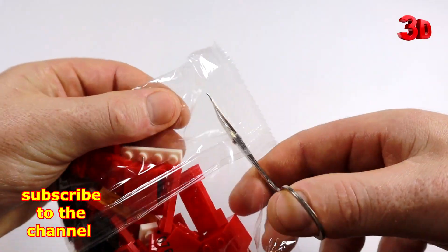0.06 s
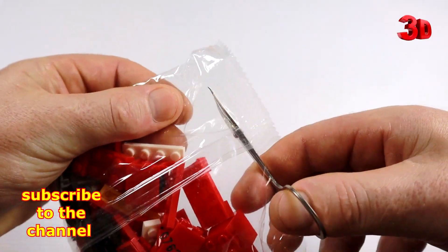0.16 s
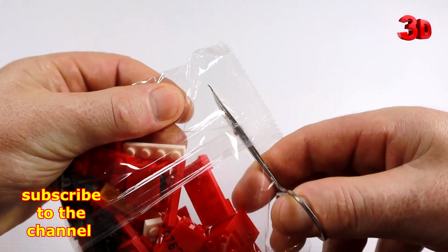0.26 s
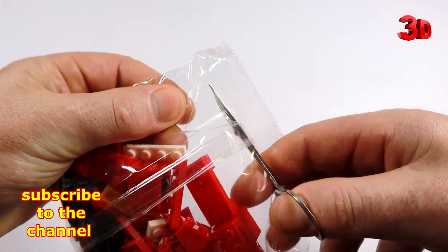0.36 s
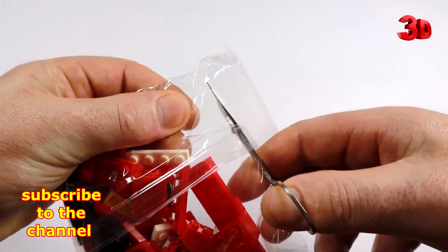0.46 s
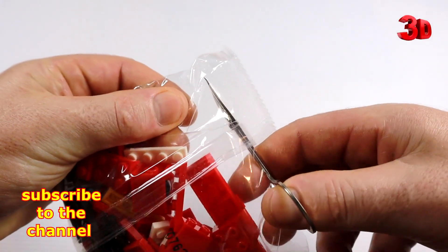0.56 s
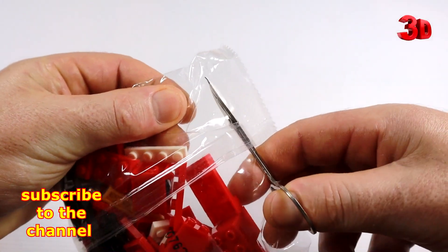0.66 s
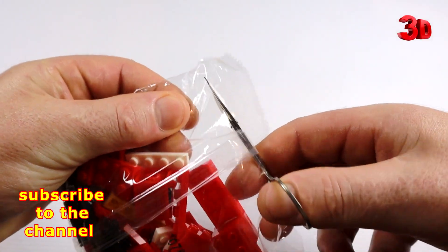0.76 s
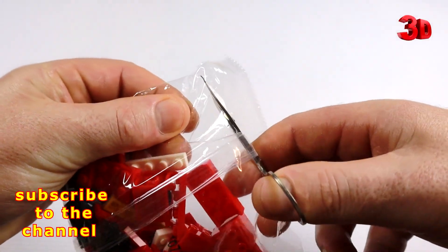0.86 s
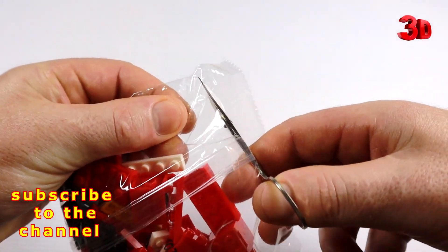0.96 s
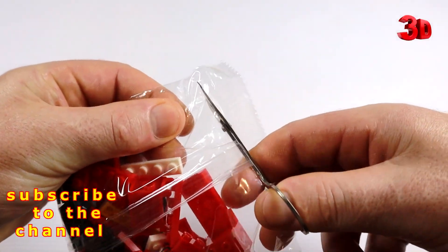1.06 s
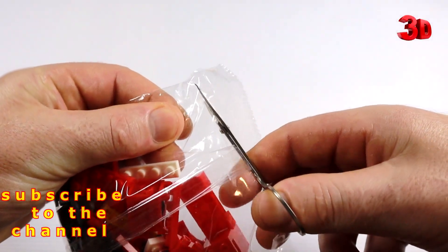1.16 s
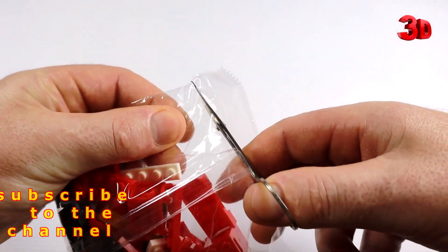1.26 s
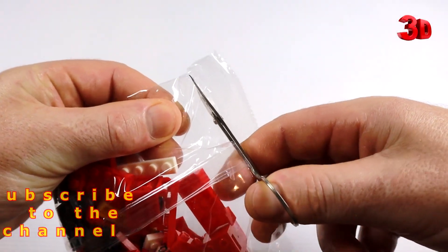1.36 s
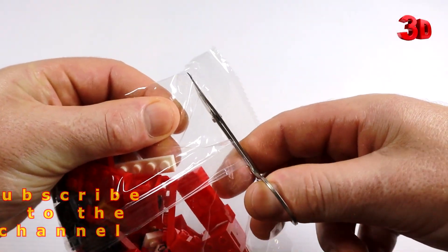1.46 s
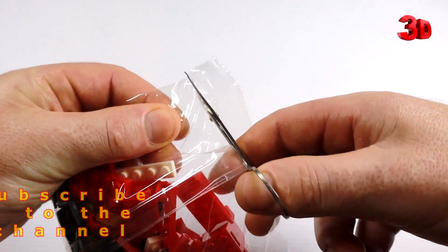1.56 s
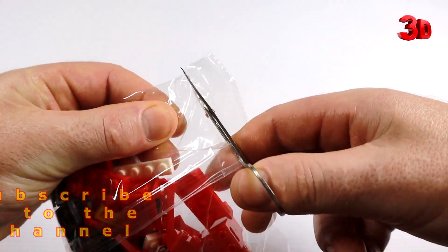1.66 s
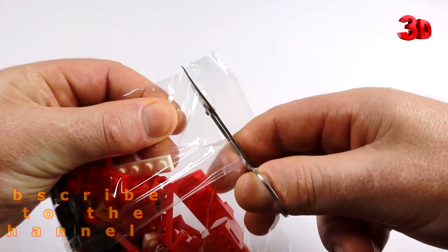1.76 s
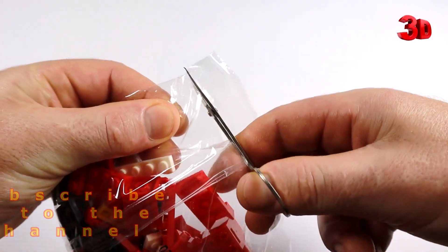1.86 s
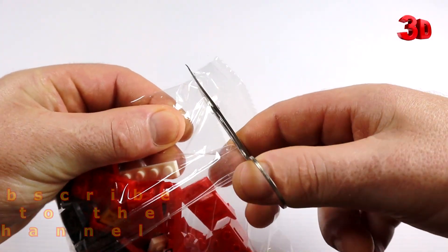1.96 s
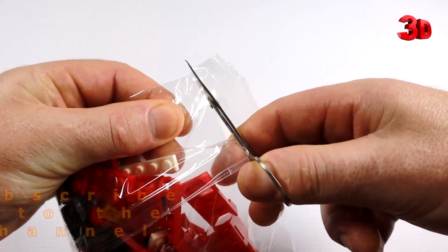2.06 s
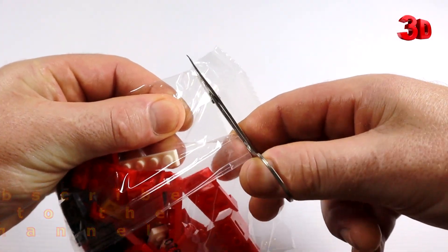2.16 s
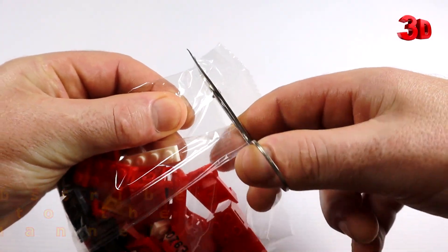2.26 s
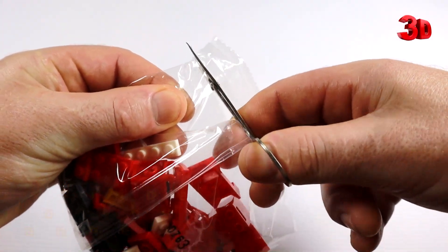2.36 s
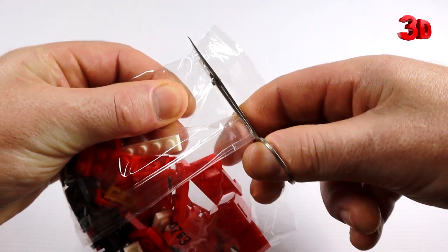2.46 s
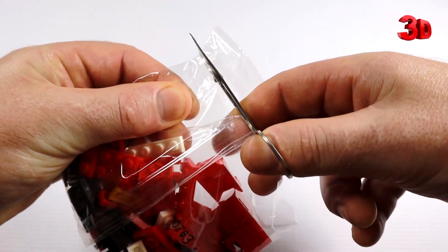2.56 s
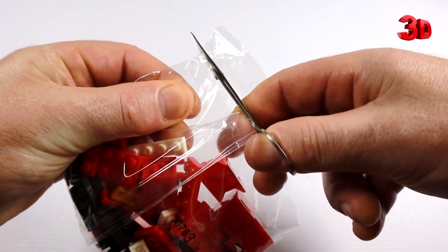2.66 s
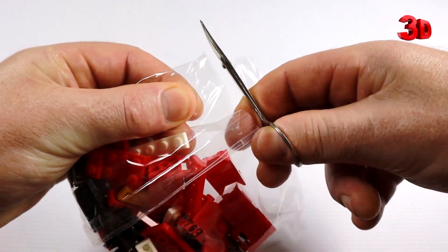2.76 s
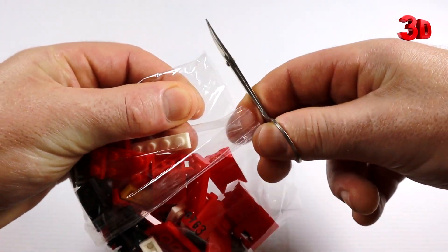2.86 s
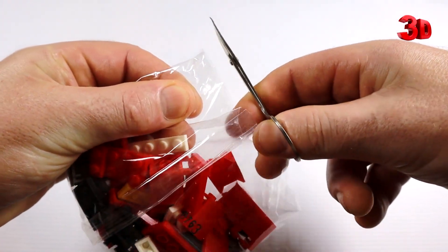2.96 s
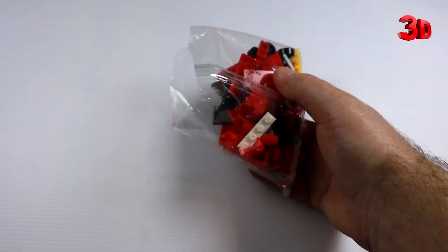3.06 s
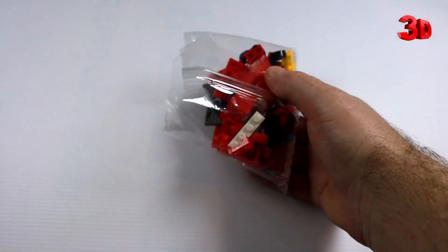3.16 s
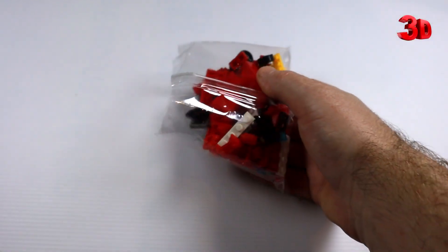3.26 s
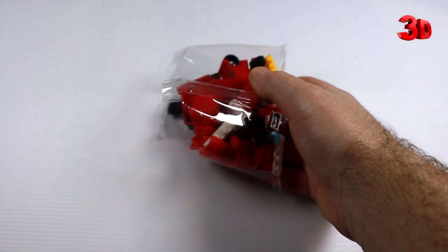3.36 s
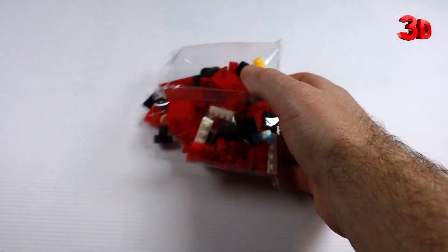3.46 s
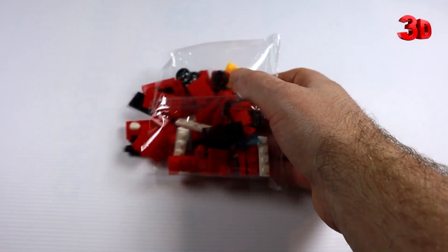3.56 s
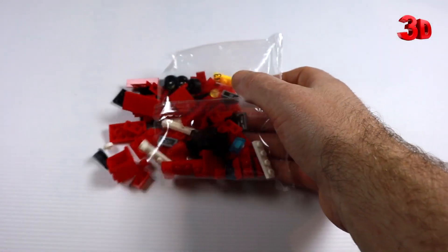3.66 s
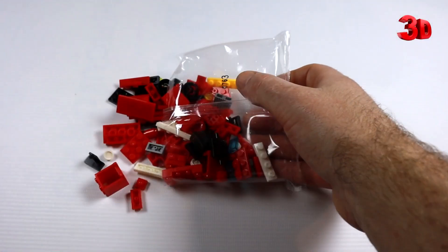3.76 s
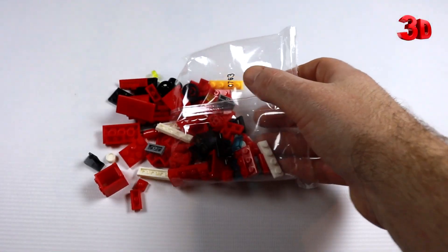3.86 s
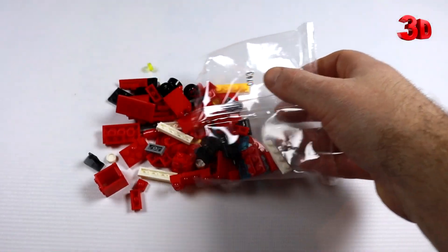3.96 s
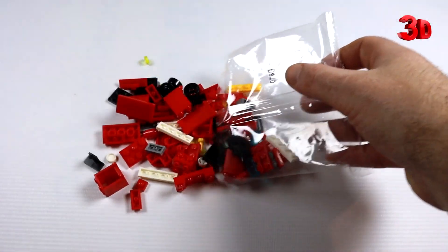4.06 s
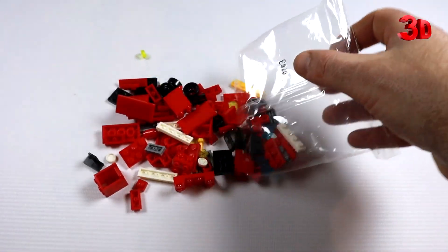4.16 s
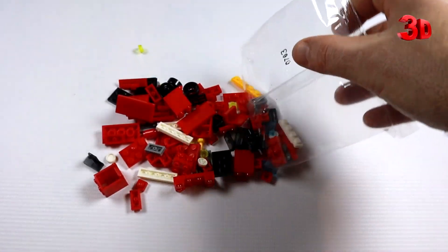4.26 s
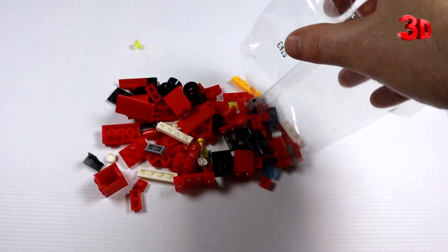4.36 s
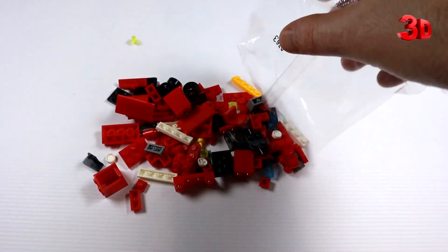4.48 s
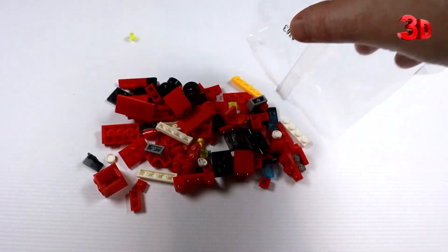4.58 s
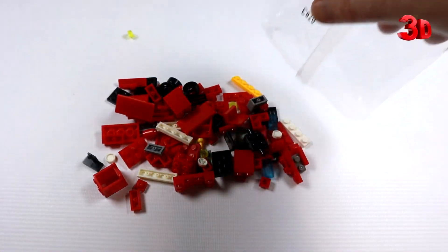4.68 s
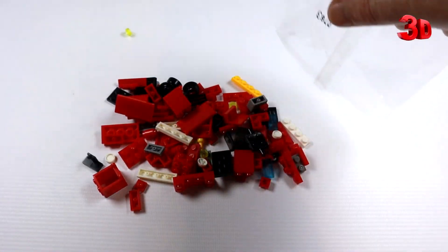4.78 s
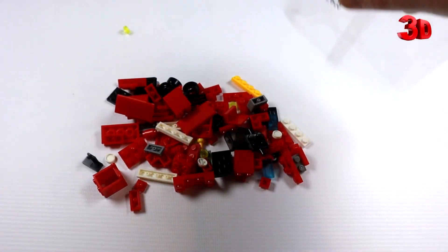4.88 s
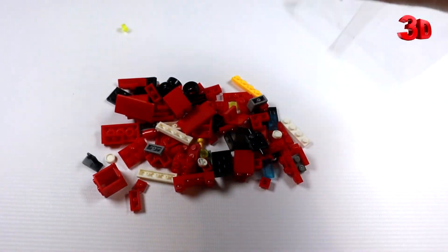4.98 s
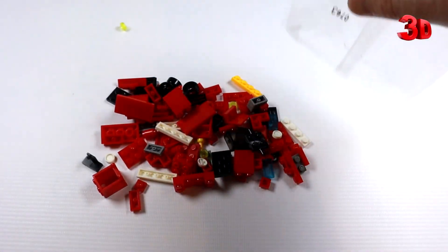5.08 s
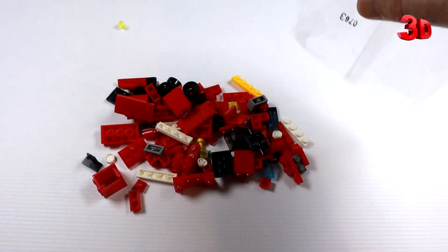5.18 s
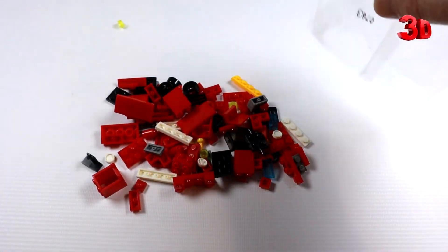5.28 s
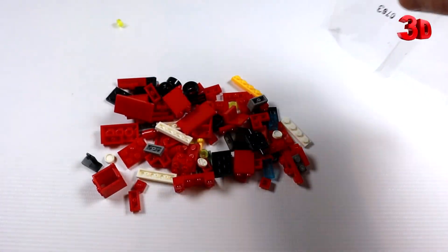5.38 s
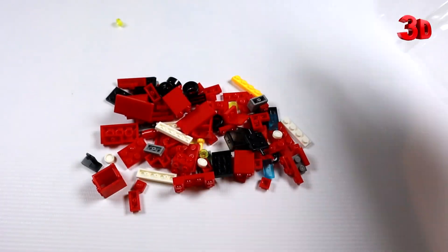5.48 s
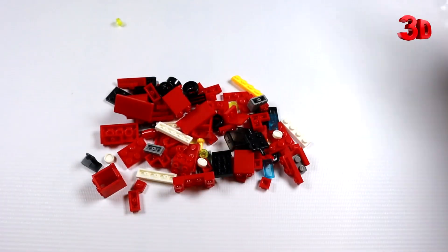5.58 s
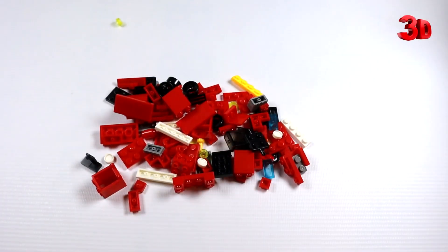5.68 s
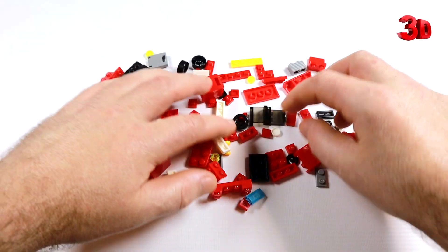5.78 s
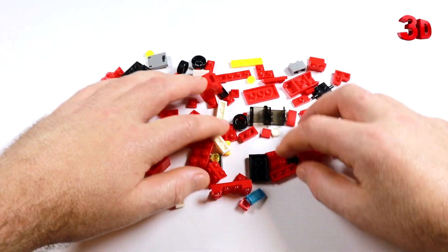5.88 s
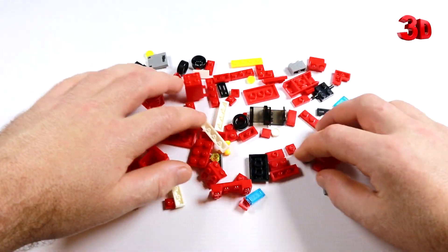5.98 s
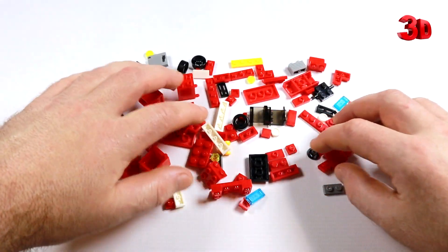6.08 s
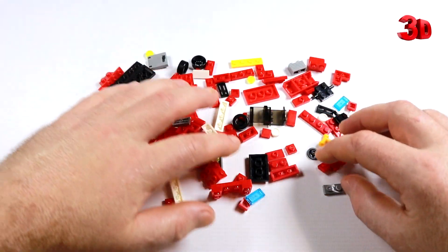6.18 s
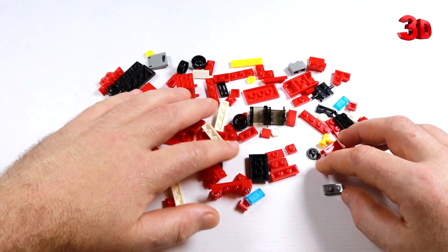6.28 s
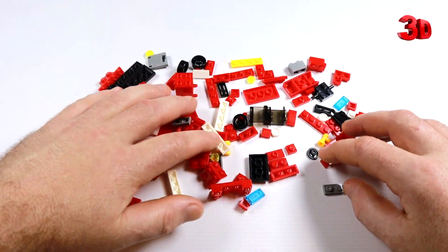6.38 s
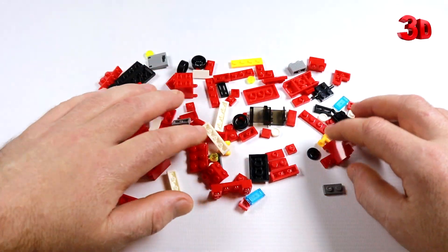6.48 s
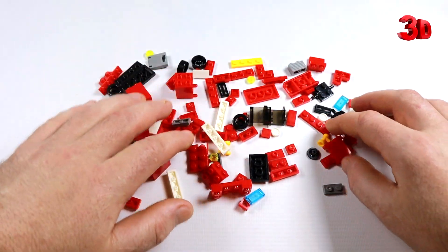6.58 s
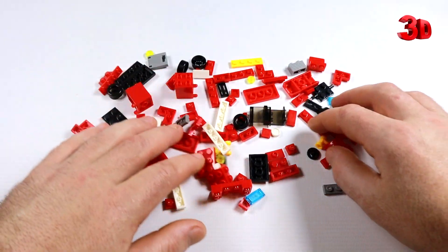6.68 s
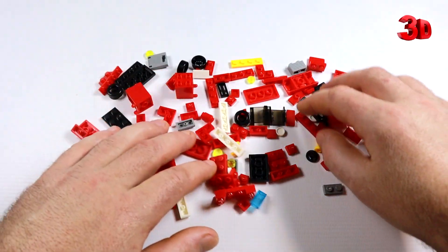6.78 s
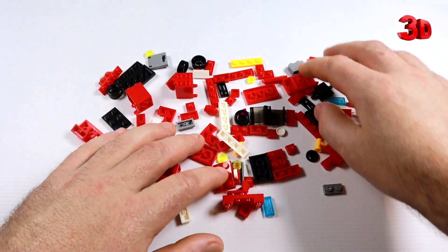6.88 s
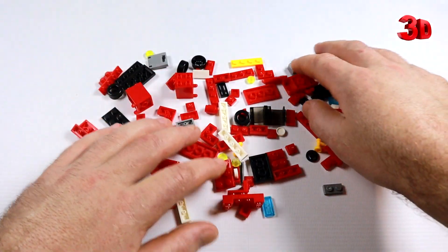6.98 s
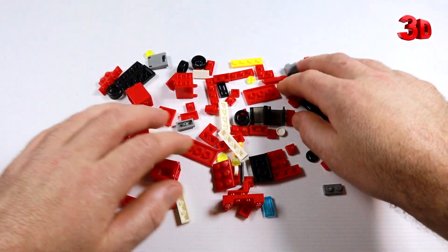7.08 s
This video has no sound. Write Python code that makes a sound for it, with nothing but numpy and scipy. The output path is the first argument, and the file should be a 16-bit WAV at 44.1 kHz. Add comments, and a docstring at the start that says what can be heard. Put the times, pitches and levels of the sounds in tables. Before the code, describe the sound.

Close up in a small, slightly reflective room, a plastic bag is held and cut with scissors, giving sharp, irregular crackles. Little plastic building bricks then tumble out onto a tabletop in two surges, clicking, ringing and scraping. A short lull follows with a few snaps from the bag being pulled away, before hands spread the pieces with more light clicks and rattles.

```python
"""Scissors cut a stiff plastic bag: its creases snap, pump the air inside and crackle in the fingers.
From about 3.2 s small hollow plastic bricks pour onto a table, clicking, ringing and scraping.
Near 5 s the empty bag is drawn away with a few more snaps, and from 5.7 s two hands push the bricks
about in three surges. Throughout, a small hard room answers and a noise gate shuts between the sounds."""
import sys
import numpy as np
from scipy import signal
from scipy.fft import rfft, irfft, next_fast_len
from scipy.io import wavfile
from scipy.ndimage import uniform_filter1d, map_coordinates

SR = 44100
rng = np.random.default_rng(int(sys.argv[2]) if len(sys.argv) > 2 else 0)


def wav_out(sig):
    """Save sig, one row per channel (or a flat mono array), as 16-bit PCM at SR to the path in sys.argv[1]."""
    wavfile.write(sys.argv[1], SR, np.round(np.clip(np.atleast_2d(sig).T, -1, 1) * 32767).astype(np.int16))


N = 314433

# Room tone colour: freq_hz, level_db
ROOM_TONE_EQ = [(20, -16.5), (50, 0.5), (110, -4.5), (250, -6.5), (800, -22), (2500, -20), (8000, -24.5),
                (16000, -40.5)]
# Colour of the shaking table: freq_hz, level_db
RUMBLE_EQ = [(25, -14.5), (48, -13), (75, -5), (115, 1.5), (170, -10.5), (300, -26.5)]
# Swell of that shaking: time_s, level_db
RUMBLE_LEVELS = [(0, -60), (.85, -60), (1.3, -69), (3.1, -60), (4.1, -52.5), (4.6, -62.5), (5.95, -56.5),
                 (6.3, -61.5), (6.7, -60), (7.13, -57)]
# Room decay: freq_hz, t60_s
ROOM_DECAY = [(300, 0.44), (2000, 0.24), (6000, 0.14), (15000, 0.099)]
# Fine crackle in the fingers: time_s, level_db
CRACKLE_LEVELS = [(0.0, -45.5), (0.68, -55), (1.12, -65), (1.41, -61.5), (1.56, -66), (1.8, -54),
                  (2.18, -58), (2.28, -55), (2.58, -50), (2.8, -49), (2.93, -62), (3.1, -55), (3.3, -43),
                  (3.5, -87), (5.4, -85), (5.6, -50), (5.75, -70)]
# Crackle colour: freq_hz, level_db
CRACKLE_EQ = [(120, -40.5), (200, -5.5), (424, -6), (612, -1), (1270, -0.5), (1500, 0), (6880, 3),
              (13600, -5), (16000, -16.5)]
# Loudest creases snapping: start_s, level_db, relative_hollow_db, relative_treble_db
SNAP_CUES = [(0.014, -12, -13.5, 0.5), (0.0557, -19.5, -8, 8.5), (0.0638, -2.5, -12, -3),
             (0.0878, 3.5, -16, -2.5), (0.1067, -6, -6, 7.5), (0.1672, -10, -8.5, -7.5),
             (0.1827, -5, -6.5, -3), (0.2259, -11.5, -9, 3.5), (0.298, 1.5, -7, 0.5),
             (0.3687, -18, -4, -15.5), (0.4153, -8, -11, -0.5), (0.4612, -14.5, -7, -2),
             (0.4706, -10.5, -14, 4), (0.5768, -19, -5, 0.5), (0.5968, -17.5, -6, -12),
             (0.6098, -14.5, -14, 1), (0.6254, -16.5, -3.5, -2), (0.6475, -1, -14.5, -3.5),
             (0.7518, -4.5, -8, -4), (0.7764, -4, -14, -4), (0.8084, -8.5, -5.5, -6.5),
             (0.8423, -17, -2.5, 1), (0.953, -11, -8, 2.5), (1.0161, -6.5, -10, -6),
             (1.1012, -27.5, -8, 7.5), (1.1589, 2, -21, 5.5), (1.1705, -17.5, -15, 10),
             (1.1901, -19, -5, 13), (1.2233, -6, -3.5, -4.5), (1.374, -15, -12, -5),
             (1.4031, -15, -8.5, -7), (1.456, -37, -19, 6), (1.5121, -8.5, -27, 5),
             (1.5272, -11.5, -12.5, 2), (1.71, -22.5, -14, 0.5), (1.7289, -16, -13.5, 5),
             (1.7723, -17.5, -9.5, 14.5), (1.7848, -3.5, -23, -6.5), (1.8029, -4.5, -23, 9.5),
             (1.9038, -13, -6.5, -10), (1.9544, -15, -14, -16), (2.069, -11, -18, 7),
             (2.0983, -7.5, -28, -5), (2.242, -8.5, -16, 1.5), (2.2679, -11, -12, -3.5),
             (2.3291, -11.5, -13.5, -3.5), (2.4091, -14.5, -20, -3), (2.4355, -13.5, -8.5, 3.5),
             (2.472, -9.5, -13.5, -3), (2.5587, -20, 0, 4), (2.6021, 2.5, -13.5, -0.5),
             (2.6089, -6, -8, 2.5), (2.6209, -3, -21, -3), (2.6768, -7, -9, -10), (2.7158, -1, -12.5, -1.5),
             (2.7404, -4.5, -5.5, -13), (2.7509, -12, -0.5, 10.5), (2.7703, -5.5, -20, 1.5),
             (2.8011, -9.5, -3, -1), (2.8135, -1.5, -8, 1.5), (2.859, -20, -27, 12), (2.8709, -3.5, -17, 3),
             (2.969, 1, -12.5, -1), (2.998, -15.5, -14, -16.5), (3.1003, -10.5, -5.5, -5.5),
             (3.1335, -11.5, -24, 5.5), (3.1503, -15, -26, 2), (4.887, -16, -10, -9.5),
             (4.9003, -17, -8, -19), (5.1232, -5, -11.5, -6), (5.441, -22.5, -8.5, -8.5),
             (5.4494, -8.5, -17.5, -13), (5.569, -8, -4.5, -10), (5.6669, -24, -13, -15)]
# Snap colour: freq_hz, level_db
SNAP_EQ = [(700, -31), (1500, -8), (2300, -2), (3500, -5), (6800, 0), (12000, -1.5), (16000, -5.5)]
# Air trapped in the bag: pitch_hz, half_width_hz, level_db
BAG_MODES = [(314, 88, -8), (639, 170, 0.5), (876, 167, 0.5), (1256, 390, 1)]
# Ringing brick walls: pitch_hz, width_hz, level_db
BRICK_MODES = [(2580, 108, -18), (3840, 52, -2.5), (5390, 47, -2), (6534, 14, -5), (6040, 70, 12),
               (8480, 60, -7.5), (9800, 54, -11), (11270, 41, -0.5), (11500, 24, 7.5), (12800, 200, -19),
               (13200, 86.7, -11.5)]
# Dry plastic contact: freq_hz, level_db
SCRAPE_EQ = [(1470, -36), (2500, -8), (4760, 4), (5870, 6.5), (7650, 5), (8600, 1), (14000, 0), (16000, -8)]
# Body of the table top: freq_hz, level_db
TABLE_EQ = [(120, -27.5), (300, -12), (800, -8), (1100, -8.5), (1550, -6.5), (2800, -6.5), (4200, -10),
            (6600, -120)]
# Sliding bricks, two surges from the bag, three by hand: start_s, peak_s, end_s, peak_db, jingle_hz
SURGE_CUES = [(3.15, 3.57, 3.98, -22.5, 5820), (3.8, 4.18, 4.51, -29.5, 6745),
              (5.938, 5.969, 6.2, -38, 6490), (6.297, 6.421, 6.57, -46, 5650),
              (6.606, 6.71, 6.98, -34, 6520)]
# Loudest brick hits: start_s, level_db, pitch_hz, relative_knock_db
CLICK_CUES = [(3.2294, 0.5, 7100, -11), (3.3135, 2.5, 6980, -15.5), (3.3347, -3.5, 12200, -23),
              (3.382, -12, 12300, 3), (3.4598, -13.5, 6400, 1.5), (3.486, 1, 6200, -12),
              (3.508, 9.5, 13700, -32), (3.5242, 3, 8700, -24), (3.5483, 8, 8400, -31),
              (3.5587, 3, 9100, -24), (3.5647, 7, 10540, -16), (3.5737, 13, 8500, -9.5),
              (3.603, 6, 8480, -21), (3.6741, 0, 5680, -5.5), (3.7387, 4, 10900, -14),
              (3.7557, 3.5, 8460, -24), (3.7674, -1, 5740, -5.5), (3.8021, 3.5, 5900, -30.5),
              (3.8152, -6, 5600, -6), (3.8393, -3, 4130, -3.5), (3.9388, -17.5, 5900, 4),
              (3.9644, -7.5, 6300, -3.5), (4.0181, 0, 6430, -14), (4.061, -5.5, 6840, -1.5),
              (4.103, -8, 10960, -8), (4.1862, -1.5, 5620, -16), (4.199, -3, 7060, -19),
              (4.222, -11, 6600, 0.5), (4.298, -5.5, 10800, -4.5), (4.3429, -4, 8950, -6),
              (4.3653, -11, 10800, -8), (4.4099, 1, 12000, -15), (4.4749, -3.5, 11800, -13.5),
              (4.502, -17, 7400, -14), (4.5585, -6.5, 12200, -19.5), (4.5683, -9.5, 6360, -32),
              (4.582, -10.5, 11700, -22), (4.6, -16, 11470, -16), (4.639, -15, 11260, -6.5),
              (5.749, -9.5, 7730, -16), (5.757, -15.5, 4420, -7), (5.8287, -9, 12060, -14),
              (5.9496, 0, 11320, -30), (5.9528, 0, 12800, -20.5), (5.9798, -1.5, 11030, -37),
              (5.9906, 2, 5350, -25), (6.0124, 0, 7120, -19), (6.03, -9, 6440, -26), (6.0693, 2, 6550, -21),
              (6.085, -6.5, 6370, -13), (6.1023, -6.5, 6520, -20), (6.3049, -8, 10770, -3.5),
              (6.3791, -13.5, 7246, -28), (6.419, -5.5, 6830, -31), (6.448, -11, 4880, -26),
              (6.4598, -6, 5800, -24), (6.5587, 3, 12140, -18.5), (6.646, -3.5, 6300, -19),
              (6.6492, -4, 6500, -39), (6.679, -0.5, 6840, -41), (6.6845, 4.5, 6520, -29),
              (6.724, 3.5, 12120, -37), (6.7555, -1, 14100, -32), (6.7724, -4.5, 6430, -28),
              (6.8319, -5, 11800, -42), (6.8499, -1.5, 11860, -21), (6.8655, -8, 12000, -20),
              (6.9106, -14.5, 6440, -16), (6.9292, -7, 11040, -20), (7.0068, -13.5, 12120, -37),
              (7.032, -18, 11900, -22), (7.0798, -17.5, 12800, -11), (7.096, -7, 11510, -22)]
# Stereo side against mid: freq_hz, level_db
SIDE_EQ = [(60, -25), (110, -15.5), (200, -20.5), (380, -17), (700, -20), (1290, -26), (2380, -45.5),
           (4400, -30.5), (8120, -21.5), (15000, -20)]
# Steep cut of the highest treble, near 16 kHz: freq_hz, gain_db
TOP_CUT_EQ = [(14000, 0.5), (15700, -1.5), (15900, -12), (16250, -21.5), (16900, -38)]


def amp(db):
    return 10 ** (np.asarray(db) / 20)


def unit(x):
    return x / np.sqrt(np.mean(x ** 2) + 1e-20)


def even(rows):
    """Every row at energy 1."""
    return rows / np.linalg.norm(rows, axis=1, keepdims=True)


def along(points, hz):
    """Reads (freq_hz, value) points on a log axis."""
    freqs, values = np.transpose(points)
    return np.interp(np.log(hz + 1), np.log(freqs + 1), values)


def fader(points):
    """Gain per sample from (time_s, level_db) points; silent after the last."""
    return amp(np.interp(np.arange(N) / SR, *np.transpose(points), right=-120))


def filtered(x, response):
    """EQ by a gain that is a function of frequency."""
    size = next_fast_len(N + SR // 2)
    return irfft(rfft(x, size) * response(np.fft.rfftfreq(size, 1 / SR)), size)[..., :N]


def coloured(x, eq):
    """Minimum-phase EQ: nothing rings ahead of a hit."""
    cepstrum = irfft(np.log(amp(along(eq, np.fft.rfftfreq(2048, 1 / SR))) + 1e-4))
    cepstrum[1:1024] *= 2
    cepstrum[1025:] = 0
    kernel = irfft(np.exp(rfft(cepstrum)))
    return signal.fftconvolve(x, kernel / np.linalg.norm(kernel))[:N]


def place(start_s, rows):
    """Mixes one short waveform per event at its time."""
    at = np.round(np.asarray(start_s) * SR).astype(int)[:, None] + np.arange(rows.shape[1])
    return np.bincount(at.ravel(), rows.ravel(), N + SR)[:N]


def bursts(count, t60_s, rise_s, spike):
    """Rows of noise that swell to a spike 3 ms in and die away."""
    t = np.arange(-132, 768) / SR
    swell = np.exp(t / np.clip(rise_s, 1e-4, .002))
    decay = amp(-60 * t / np.clip(t60_s, .002, .05))
    noise = rng.standard_normal((count, len(t)))
    return (noise + spike * (t == 0)) * np.where(t < 0, swell, decay)


def rings(hz, width_hz, attack_s):
    """One damped sine per row; a wide resonance dies fast."""
    t = np.arange(700) / SR
    return np.sin(2 * np.pi * hz * t) * np.exp(-np.pi * width_hz * t) * (1 - np.exp(-t / attack_s))


def swarm(count, spread_db):
    """Random grain times and sizes: many small, few large."""
    draw = rng.random((count, 2))
    return draw[:, 0] * N / SR, amp(-spread_db * np.log(1 - draw[:, 1]))[:, None]


def background():
    """A bed of room tone and the low shaking of the table."""
    tone = amp(-59.5) * unit(coloured(rng.standard_normal(N), ROOM_TONE_EQ))
    rumble = fader(RUMBLE_LEVELS) * unit(coloured(rng.standard_normal(N), RUMBLE_EQ))
    return tone + rumble


def room_reverb(x):
    """Highs die first, over a faint long echo; the tail is drawn anew every 0.1 s, as the sources move."""
    wet, step = np.zeros(N + SR), SR // 10
    for start in range(0, N, step):
        hz, t, noise = signal.stft(rng.standard_normal(SR * 3 // 5), SR, nperseg=256)
        decay = amp(-60 * t / along(ROOM_DECAY, hz)[:, None]) + amp(-18.5 - 60 * t / 1.5)
        tail = signal.istft(noise * decay, SR, nperseg=256)[1]
        echo = signal.fftconvolve(x[start:start + step], tail / np.linalg.norm(tail))
        wet[start + 220:][:len(echo)] += echo  # 5 ms pre-delay
    table_bounce = np.pad(wet, (round(.0013 * SR), 0))  # the table top mirrors the room
    return wet[:N] + 0.15 * table_bounce[:N]


def bag_crackle():
    """The film gives way in the fingers in countless tiny ticks."""
    times, sizes = swarm(count=2500, spread_db=3.5)
    ticks = place(times, sizes * bursts(len(times), t60_s=0.01, rise_s=0.00094, spike=19))
    return fader(CRACKLE_LEVELS) * unit(coloured(ticks, CRACKLE_EQ))


def bag_snaps():
    """Each crease snaps as a noisy burst; wide ones pump the air in the bag, tight ones give treble."""
    start_s, level_db, hollow_db, treble_db = np.transpose(SNAP_CUES)[:, :, None]
    t60_s = 0.024 * amp(-0.24 * (level_db + 17))  # louder snaps die faster
    burst = bursts(len(start_s), t60_s, rise_s=0.001, spike=7.4)
    hz = np.fft.rfftfreq(burst.shape[1], 1 / SR)
    spectrum = rfft(burst) * amp(along(SNAP_EQ, hz))
    crossover = along([(5500, 0), (9000, 1)], hz)
    body = even(irfft(spectrum * (1 - crossover)))
    treble = even(irfft(spectrum * crossover))
    hollow = 0
    for pitch, half_width, mode_db in BAG_MODES:
        band = signal.butter(2, [pitch - half_width, pitch + half_width], "band", fs=SR, output="sos")
        hollow += amp(mode_db + rng.normal(0, 4.3, start_s.shape)) * even(signal.sosfilt(band, burst))
    snaps = body + amp(treble_db) * treble + amp(hollow_db) * even(hollow)
    return place(start_s[:, 0] - .003, amp(level_db) * snaps)


def surge_db(depth_db=27.5, roundness=1.47):
    """Level of the sliding bricks: each surge swells to a rounded peak and ebbs."""
    t, gain = np.arange(N) / SR, 0
    for start_s, peak_s, end_s, peak_db, _ in SURGE_CUES:
        off_peak = np.interp(t, [start_s, peak_s, end_s], [1, 0, 1], left=9, right=9)  # 9: silent
        gain += amp(peak_db - depth_db * off_peak ** roundness)
    return 20 * np.log10(gain + 1e-9)


def brick_jingle():
    """Many pieces of one size ring at nearly one pitch through each surge."""
    times, sizes = swarm(count=2500, spread_db=2)
    start_s, jingle_hz = np.transpose(SURGE_CUES)[[0, 4]]
    surge = np.maximum(np.searchsorted(start_s + .15, times) - 1, 0)
    pitch = jingle_hz[surge, None] * (1 + .006 * rng.standard_normal((len(times), 1)))
    pings = rings(pitch, width_hz=38, attack_s=.0007)
    pings += 0.48 * rings(1.6 * pitch, width_hz=76, attack_s=.0007)
    return amp(surge_db() - 11.5) * unit(place(times, sizes * pings))


def brick_slide():
    """Countless small contacts each ring one detuned wall mode, over a dry scrape and the table's body."""
    rattle_db = surge_db()
    # the table swings less than the rattle
    table_db = np.where(rattle_db > -75, -53.5 + 0.79 * (rattle_db + 40.5), rattle_db)
    times, sizes = swarm(count=5500, spread_db=2)
    modes = np.array(BRICK_MODES)[rng.integers(len(BRICK_MODES), size=len(times))]
    mode_hz, width_hz, mode_db = modes.T[:, :, None]
    pitch = mode_hz * (1 + 0.069 * rng.standard_normal(mode_hz.shape))
    ringing = unit(place(times, sizes * amp(mode_db) * rings(pitch, width_hz + 80, attack_s=0.00053)))
    contacts = place(times, sizes * bursts(len(times), t60_s=0.024, rise_s=0.0034, spike=1.2))
    scrape = unit(coloured(contacts, SCRAPE_EQ))
    table = unit(coloured(contacts, TABLE_EQ))
    return amp(rattle_db) * (amp(-8) * ringing + amp(-3.5) * scrape) + amp(table_db) * table


def brick_hits(start_s, level_db, pitch_hz, knock_db):
    """A struck piece rings at its own pitch over the modes of all bricks, cracks, and knocks the table."""
    scatter = rng.standard_normal((len(start_s), len(BRICK_MODES) + 1, 2))
    # opposite walls are not quite in tune, so the ring beats and dies unevenly
    wall = rings(pitch_hz, width_hz=120, attack_s=0.0014)
    far_wall = rings(pitch_hz * (1 + 0.046 * scatter[:, -1, :1]), width_hz=220, attack_s=.0004)
    shared = 0
    for k, (mode_hz, width_hz, mode_db) in enumerate(BRICK_MODES):
        detuned_hz = mode_hz * (1 + 0.024 * scatter[:, k, 1:])
        shared += amp(mode_db + 5 * scatter[:, k, :1]) * rings(detuned_hz, width_hz + 90, attack_s=0.0045)
    ring = amp(-4.5) * even(wall + 0.61 * far_wall) + amp(-10) * even(shared)
    crack = even(bursts(len(start_s), t60_s=0.019, rise_s=0.0034, spike=2.3))
    knock = even(bursts(len(start_s), t60_s=0.026, rise_s=0.0024, spike=1.6))
    times = start_s[:, 0]
    return (place(times - .001, amp(level_db) * ring)
            + coloured(place(times - .003, amp(level_db - 5) * crack), SCRAPE_EQ)
            + coloured(place(times - .003, amp(level_db + knock_db) * knock), TABLE_EQ))


def brick_clicks(strays_per_s=45):
    """Bricks strike bricks and table: the loud cued hits, and chance ones that ride the surges."""
    when, force, pitch, knock = rng.random((round(strays_per_s * N / SR), 4)).T[:, :, None]
    strays = brick_hits(start_s=.01 + when * (N / SR - .01), level_db=10 * force,
                        pitch_hz=6000 * 2 ** (1.1 * pitch), knock_db=-30 + 16 * knock)
    cued = brick_hits(*np.transpose(CLICK_CUES)[:, :, None])
    return cued + amp(surge_db() - 6) * unit(strays)


def scene():
    """Bag and bricks up close and centred, with the room behind them."""
    close = bag_snaps() + bag_crackle() + brick_clicks() + brick_slide() + brick_jingle()
    mix = close + amp(-6.5) * room_reverb(close) + background()
    return np.array([mix, mix])


def noise_gate(x, threshold_db, release_s, attack_s):
    """Peaks over the threshold open it; it fades shut, deeper on the bass than on the treble."""
    now = np.arange(N)
    last_peak = np.maximum.accumulate(np.where(np.abs(x) > amp(threshold_db), now, 0))
    quiet_s = (now - last_peak) / SR
    fade = np.clip(1 - quiet_s / release_s, 0, 1) ** 1.41
    floors = amp([-39 - 20 * quiet_s, -15 - 25 * quiet_s])
    bass_gain, treble_gain = np.minimum(uniform_filter1d(fade + floors, round(attack_s * SR)), 1)
    bass = filtered(x, lambda hz: 1 / (1 + (hz / 350) ** 4))
    return bass * bass_gain + (x - bass) * treble_gain


def record(dry):
    """One gated, softly clipped signal; the two channels flicker faintly apart and lose their very top."""
    mid = noise_gate(dry[0], threshold_db=-30.5, release_s=0.14, attack_s=0.014)
    mid = mid / (1 + np.abs(mid) ** 10) ** (1 / 10)
    flicker = map_coordinates(rng.standard_normal(N // 250 + 4), [np.arange(N) / 250])
    side = filtered(mid * flicker, lambda hz: amp(along(SIDE_EQ, hz)))
    stereo = np.array([mid + side, mid - side])
    return filtered(stereo, lambda hz: amp(along(TOP_CUT_EQ, hz)) * (hz < 16974))


dry = scene()
out = record(dry)
wav_out(out)
```